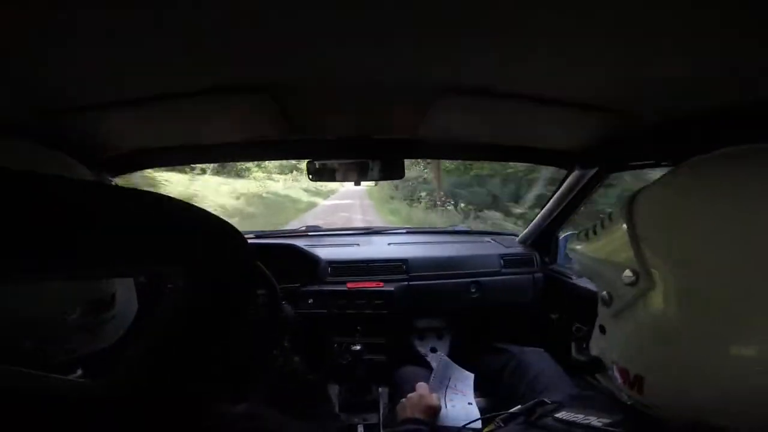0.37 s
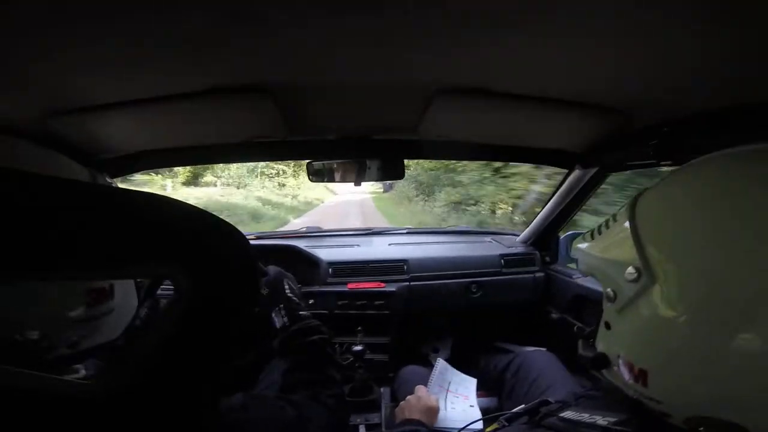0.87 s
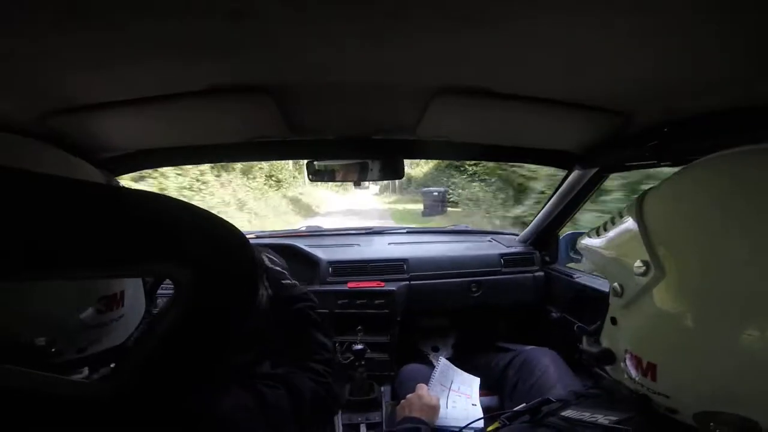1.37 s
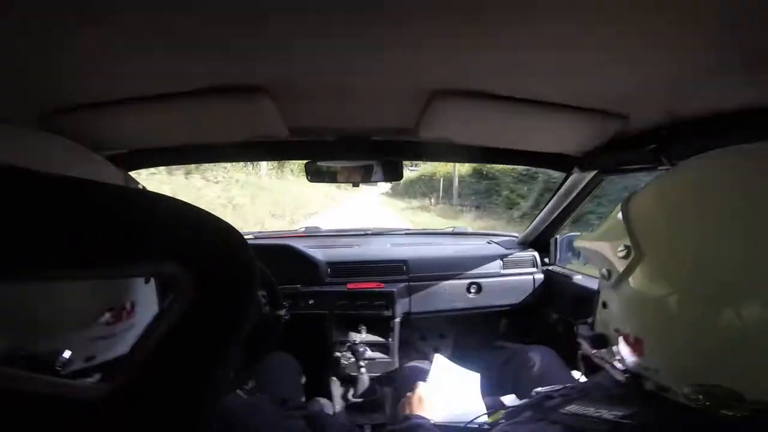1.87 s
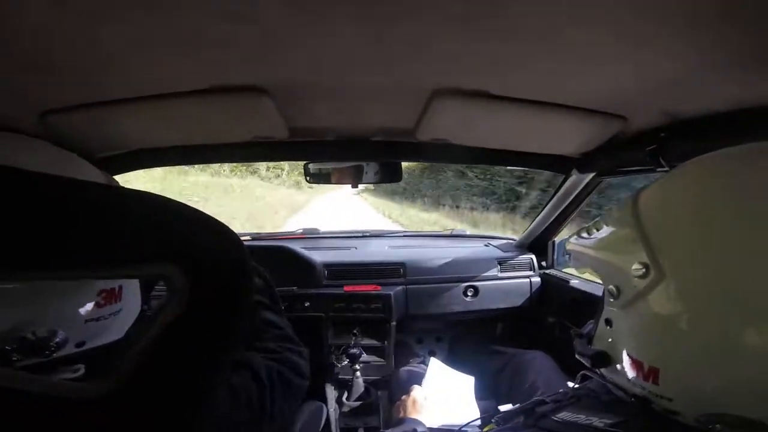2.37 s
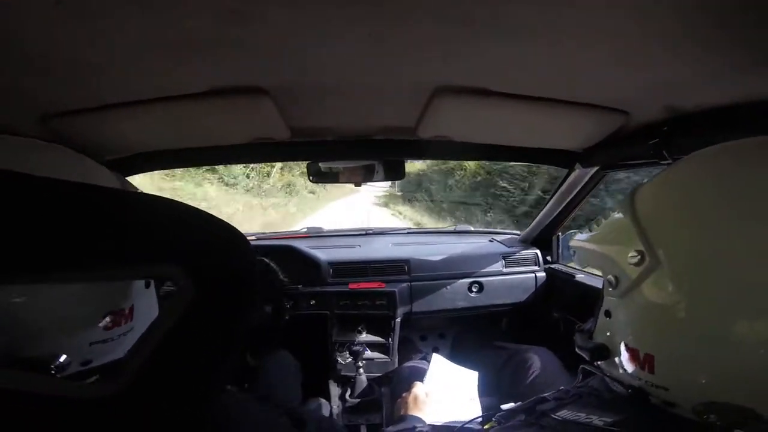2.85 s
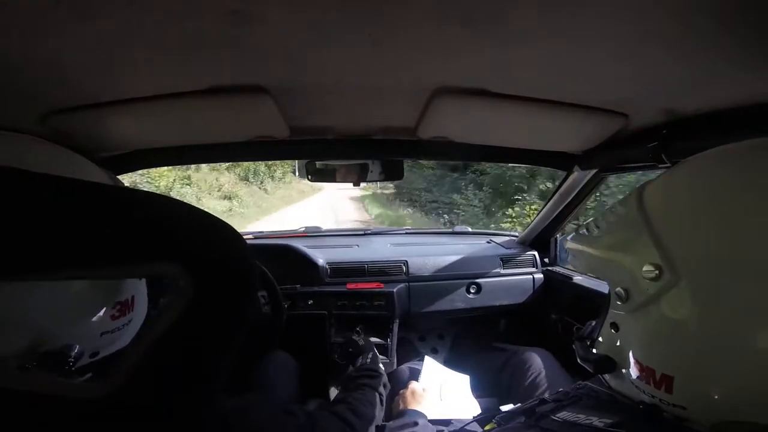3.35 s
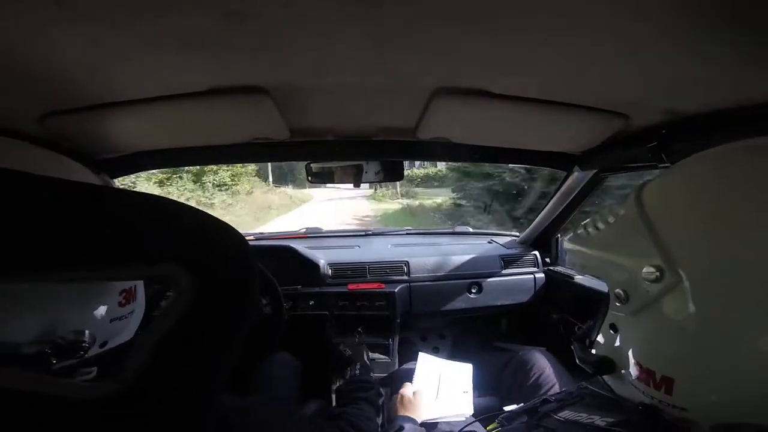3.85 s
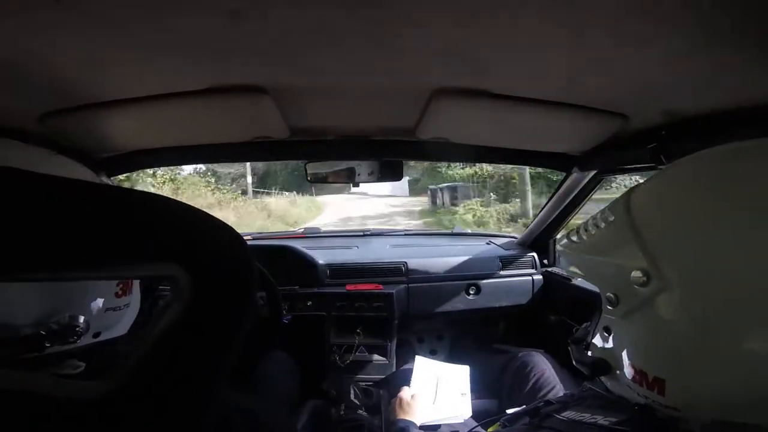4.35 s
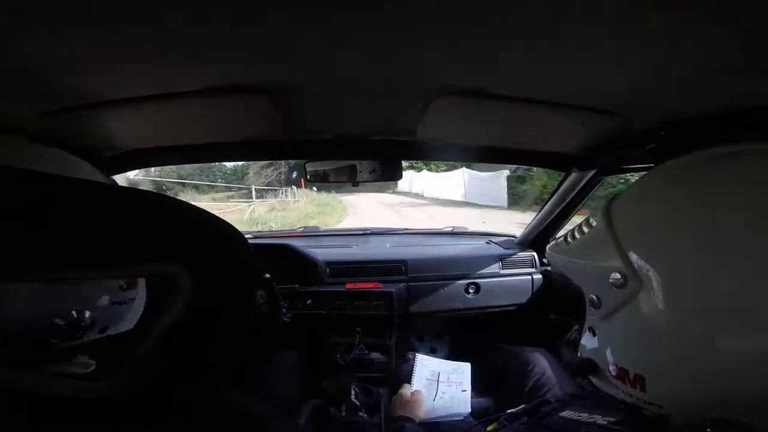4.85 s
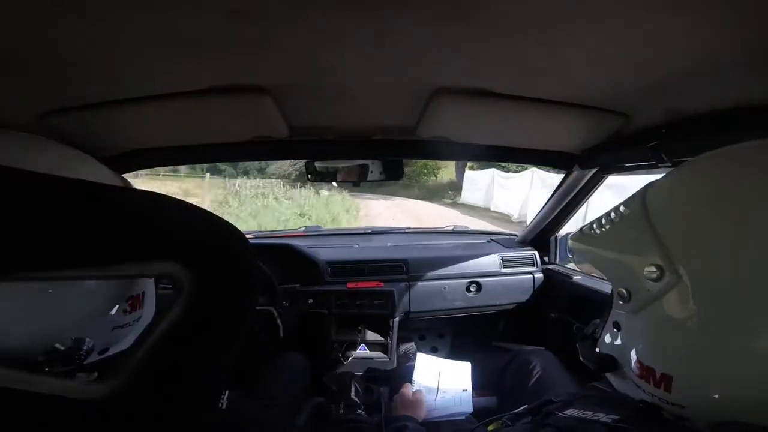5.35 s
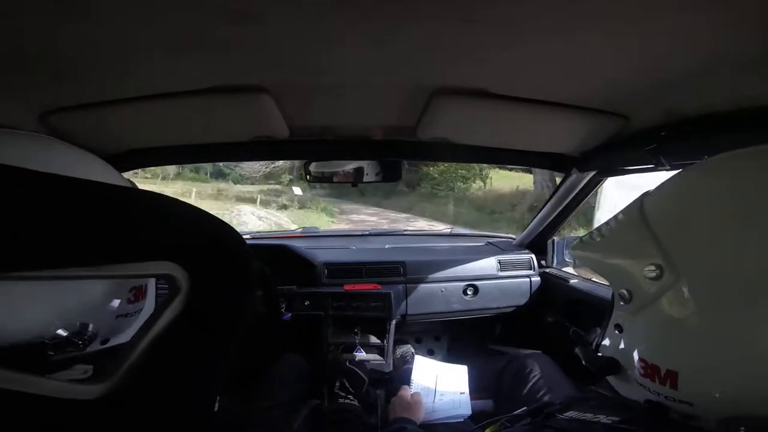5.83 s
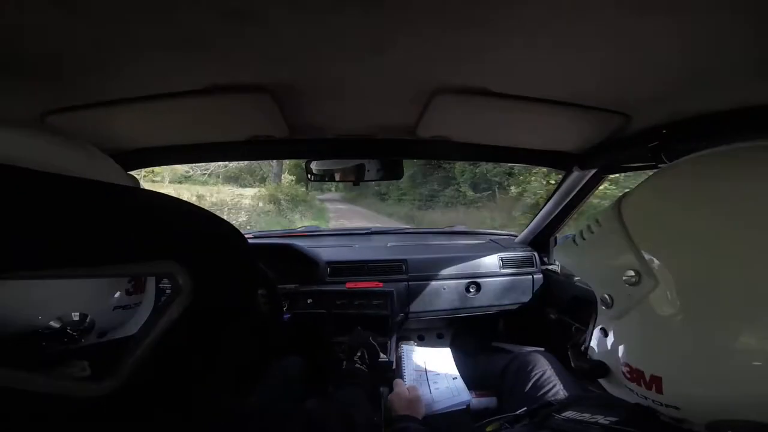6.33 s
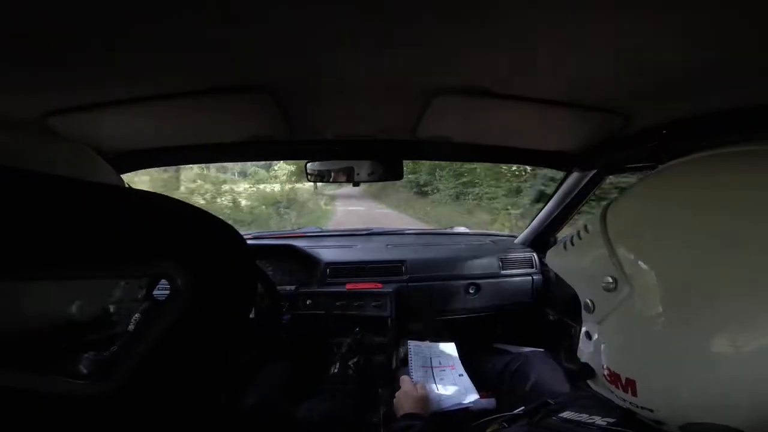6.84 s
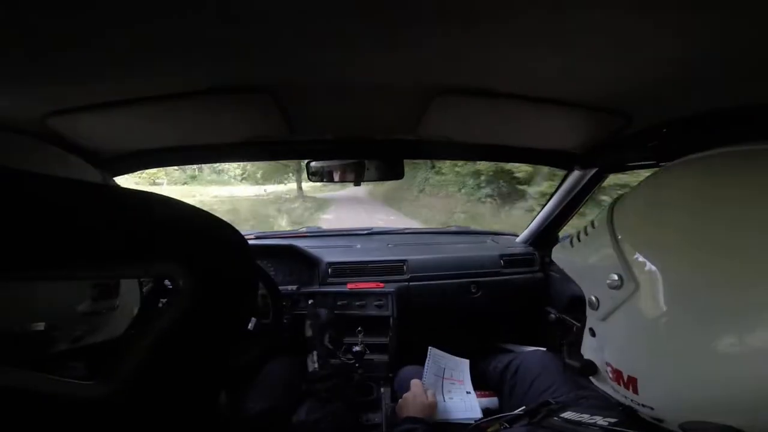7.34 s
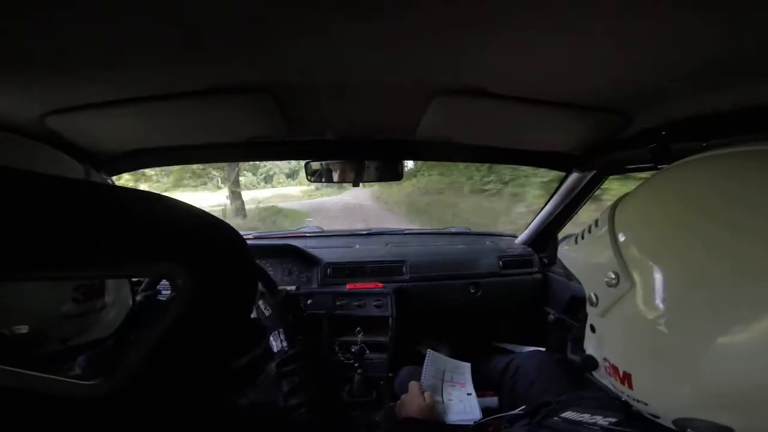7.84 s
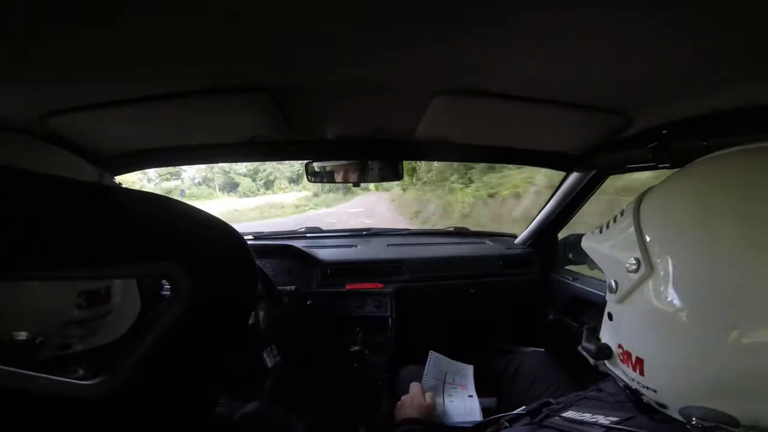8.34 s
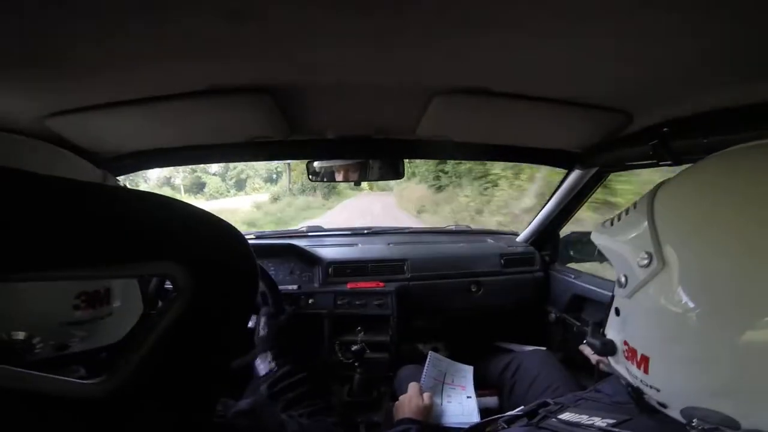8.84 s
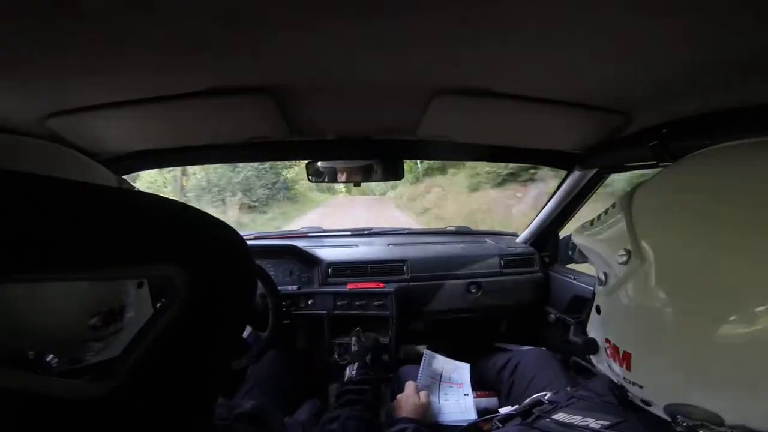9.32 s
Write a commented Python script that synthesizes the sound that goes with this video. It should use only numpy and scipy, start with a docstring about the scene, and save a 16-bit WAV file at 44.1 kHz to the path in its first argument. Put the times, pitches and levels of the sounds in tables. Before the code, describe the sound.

Close cabin microphone, dry and slightly saturated. The engine growls high at first, then coasts down unevenly while gravel rattles thickly against the metal floor. A quick rev climbs to the highest pitch, falls through a gear change and becomes a heavy low drone that slowly rises. Tyre thrum, body roar and bumps lie beneath; stones are sparser during the drone and burst back at the end.

```python
"""Hard-driven car on gravel

Inside the car a four-cylinder engine pulls, eases off, spins up and, after a gear change, booms in the cabin.
The engine is a stack of tones tied to its revs, with a noisy rasp that pulses with each firing.
Large stones crack, thud and ring under the floor: short noise bursts and dying tones. Small stones and grit
spray around them. Shaped noise makes the bumps, the tyre thrum and the roar of the car's shell.
"""
import sys
import numpy as np
from scipy import signal
from scipy.fft import rfft, irfft, next_fast_len
from scipy.io import wavfile
from scipy.ndimage import uniform_filter1d

SR = 44100
rng = np.random.default_rng(int(sys.argv[2]) if len(sys.argv) > 2 else 0)


def wrap_up_sound(samples):
    """Save the sound to the file named by the first command line argument, as 16-bit audio."""
    columns = np.atleast_2d(samples).T
    # keep every value between -1 and 1, then stretch to whole-number steps
    tamed = np.clip(columns, -1, 1)
    steps = np.round(tamed * 32767).astype(np.int16)
    wavfile.write(sys.argv[1], SR, steps)


def voltage_ratio(level):
    """Linear amplitude factor for a level in decibels (scalar or array-like)."""
    return 10 ** (np.asarray(level, float) / 20)


N = 416738  # length in samples
T = np.arange(N) / SR  # time in seconds

# How the engine is driven. Each row: time in seconds, four-stroke cycles in Hz, firing tone level in dB,
# pedal as the level of the other tones in dB.
ENGINE_DRIVE = [(0, 43.73, -20.5, -21.5), (.06, 43.74, -24, -19), (.23, 44.6, -19, -20.5),
                (.48, 44.96, -21.5, -17.5), (.76, 45.24, -20.5, -19.5), (.95, 46.12, -19.5, -18),
                (1.24, 46.33, -20, -19), (1.52, 47.03, -19.5, -17.5), (1.6, 44.74, -26, -24.5),
                (1.83, 43.1, -17.5, -24.5), (1.95, 41.9, -37, -29), (2.22, 38.43, -44, -32.5),
                (2.42, 36.8, -29, -26), (2.7, 37.7, -32, -28.5), (2.92, 37.2, -27.5, -25),
                (3.16, 35.05, -24.5, -23), (3.33, 33.22, -30.5, -38), (3.49, 33.4, -35, -45),
                (3.58, 33, -24.5, -23.5), (3.66, 32.92, -38, -26.5), (3.74, 32.22, -24.5, -44),
                (3.87, 32.46, -23, -24), (4.1, 30.12, -33, -46), (4.18, 30, -22, -30),
                (4.3, 28.76, -40, -18), (4.44, 26.4, -23.5, -44), (4.52, 26.44, -21.5, -28),
                (4.7, 26.68, -24.5, -43), (4.8, 29.5, -22.5, -57), (4.88, 32.65, -36, -40),
                (4.97, 35.2, -14.5, -23.5), (5.08, 39.75, -30, -17.5), (5.15, 43.5, -30.5, -21),
                (5.21, 45.7, -20, -20), (5.26, 46.85, -24.5, -19.5), (5.33, 48.3, -29, -20.5),
                (5.45, 49.85, -20, -20.5), (5.58, 50.4, -24.5, -21.5), (5.87, 50.6, -29, -24),
                (5.96, 49.8, -33, -29), (6.2, 45.4, -21, -27.5), (6.3, 43.05, -26.5, -22.5),
                (6.38, 36, -20, -17), (6.5, 33.1, -13, -23), (6.75, 30.98, -12.5, -20),
                (6.95, 31.65, -13, -24), (7.61, 32.35, -12.5, -17), (8.32, 33.7, -13.5, -19.5),
                (8.95, 35.15, -15.5, -20.5), (8.99, 34, -25, -46), (9.06, 33.04, -24.5, -36),
                (9.45, 30.35, -30, -22)]
# Tones from uneven cylinders and pipes. Each row: multiple of the cycle, relative level in dB under pedal
# at each of the four PEDAL_REVS, relative level in dB when coasting.
ENGINE_ORDERS = [(2, -33.5, -30, -9, -8, -10), (3, -33, -24.5, -11, -16, -9),
                 (5, -8.5, -23.5, -9.5, -8.5, -13), (6, -6, -34, -11.5, -21.5, -6.5),
                 (7, -29, -20.5, -19.5, -20, -33), (8, -15, -13, -9.5, -4.5, -14),
                 (9, -23, -22.5, -30, -11.5, -36), (10, -20.5, -33, -51, -31, -19.5),
                 (11, -22.5, -31, -29, -15, -22), (12, -29, -13, -21, -13, -19.5),
                 (13, -20.5, -37, -29, -26, -31), (14, -23.5, -27.5, -12.5, -10, -23),
                 (15, -36.5, -28, -42, -38, -30.5), (16, -13.5, -22, -17.5, -17, -37),
                 (17, -27.5, -25.5, -27.5, -24, -39), (18, -33, -18.5, -27, -25, -25),
                 (19, -25, -36.5, -19, -48, -40), (20, -31.5, -34, -22.5, -22, -29),
                 (21, -35, -36.5, -32, -39, -38), (22, -42, -34.5, -39, -33, -42),
                 (23, -40, -42, -25, -31, -26), (24, -34.5, -42.5, -29.5, -20, -43),
                 (25, -38, -39, -30.5, -27, -29), (26, -44, -38, -25.5, -31, -47),
                 (27, -50, -38, -36, -41, -38), (28, -44, -33, -25.5, -40, -39),
                 (29, -51, -33, -20, -26, -39), (30, -37.5, -45, -40.5, -23, -31),
                 (31, -46, -44, -40, -21, -44), (32, -34.5, -43, -21.5, -33, -46),
                 (34, -52, -37.5, -35, -24, -44), (36, -49.5, -40.5, -38, -27, -45)]
# The revs that the pedal levels belong to. Each entry: four-stroke cycles in Hz.
PEDAL_REVS = [31.5, 34.5, 45.5, 50.5]
# How the cabin favours some pitches. Each row: frequency in Hz, gain in dB.
CABIN_GAIN = [(40, -4), (130, -6), (250, -2.5), (300, -1), (350, -7), (380, -5), (410, -1), (460, -4.5),
              (500, -6), (530, 8), (570, -2.5), (625, 0.5), (700, -10.5), (740, -10.5), (800, -10),
              (900, -7.5), (960, -3.5), (1040, 0.5), (1110, -6), (1170, 1), (1230, -6), (1280, -2.5),
              (1350, -11.5), (1450, -9), (1510, -7), (1570, -7.5), (1750, -11)]
# Colour of the valve gear and intake rasp. Each row: frequency in Hz, relative level in dB per Hz.
CLATTER_COLOUR = [(500, -40), (1000, 4.5), (1400, 0.5), (2200, -4.5), (3800, -10), (4600, -19), (7000, -23),
                  (10000, -64)]

# Large stones. Each row: start in seconds, relative level in dB, brightest frequency in Hz,
# thud in dB against the crack (before their shared levels), time for the crack to fall 60 dB in seconds.
LARGE_STONES = [(0.4349, -22.5, 1480, 4, 0.068), (0.812, -33, 3700, -10, 0.18),
                (0.897, -27, 6400, -15, 0.03), (0.9179, -22.5, 1900, -7, 0.091),
                (1.063, -27, 6400, -8, 0.045), (1.088, -21, 6400, -11, 0.046),
                (1.266, -30, 7600, -12, 0.044), (1.4022, -28, 1970, -4.5, 0.32),
                (1.443, -18, 1480, -21, 0.11), (1.4716, -15, 1376, -25, 0.059),
                (1.4992, -16, 2680, -22.5, 0.068), (1.5428, -5, 4400, -22, 0.042),
                (1.6336, -16.5, 2480, -24, 0.18), (1.667, -14.5, 2700, -19, .1),
                (1.68, -17.5, 1580, -25, 0.089), (1.69, -20, 3135, -20, 0.055),
                (1.706, -34, 2900, -23, .06), (1.718, -23, 6400, -20, .05), (1.8208, -23, 1392, -8.5, 0.42),
                (1.8836, -22, 2940, -20, 0.16), (1.9358, -17, 2570, -9, 0.12),
                (2.0135, -27.5, 1798, -7, 0.17), (2.1121, -24.5, 2955, 2.5, 0.044),
                (2.177, -27, 3387, -19, 0.049), (2.2172, -18.5, 1478, -14.5, 0.05),
                (2.261, -19, 3384, 1, 0.045), (2.3177, -20.5, 3040, -10, 0.069),
                (2.361, -28, 4630, -8, 0.043), (2.4506, -20.5, 3620, -2, 0.035),
                (2.482, -28, 6600, -2.5, 0.24), (2.6189, -26, 2945, -6, 0.058),
                (2.6727, -17, 2670, -28, 0.045), (2.7427, -27, 3375, -4, 0.18),
                (2.809, -20, 2855, -19, 0.083), (2.8848, -20, 2850, -7.5, 0.14),
                (2.9317, -10.5, 3960, -19, 0.056), (2.948, -17, 3930, -10, .1),
                (2.994, -19, 1810, -18, .08), (3.005, -18, 3840, -14, 0.17), (3.053, -17, 1830, -10, 0.14),
                (3.066, -18, 3900, -15, .08), (3.1005, -16.5, 6400, -14, 0.07),
                (3.112, -19, 3600, -7, 0.069), (3.2634, -25, 2172, -1, 0.027),
                (3.6341, -17.5, 1463, -26, 0.075), (3.695, -24, 3753, -16, 0.066),
                (3.707, -15, 3700, -7, 0.11), (3.738, -14, 1100, -4, 0.026),
                (3.912, -19.5, 3660, -6, 0.092), (3.9736, -26.5, 1624, -17, 0.32),
                (4.0136, -19.5, 3710, -5, 0.071), (4.1104, -14, 1663, -4.5, 0.11),
                (4.112, -17, 3800, -25, 0.025), (4.1574, -23.5, 1410, 1, 0.19),
                (4.199, -28, 1960, -1, 0.053), (4.2388, -32, 2125, 8.5, 0.08),
                (4.2782, -18, 2710, 3, 0.056), (4.323, -24, 2490, -13, 0.054),
                (4.3673, -20, 3450, 3, 0.082), (4.376, -27, 1200, 1, 0.048),
                (4.4458, -23, 3704, -2.5, 0.15), (4.4732, -21.5, 3043, -11.5, 0.12),
                (4.5158, -17.5, 3850, -32, 0.099), (4.521, -20, 2580, -30, 0.084),
                (4.6336, -29, 3824, -3.5, 0.48), (4.6869, -21.5, 3813, -14.5, 0.075),
                (4.7434, -36, 3722, -20, 0.19), (4.8424, -10.5, 3780, -27, 0.046),
                (4.8795, -23.5, 3358, -4, 0.15), (5.1133, -27, 1496, -1, 0.11),
                (5.3652, -22, 3720, -5, 0.23), (5.4544, -21, 6370, -4, 0.13),
                (5.5431, -17.5, 2893, -7, 0.064), (5.5933, -17, 2855, -9, 0.062),
                (5.6905, -23.5, 2484, 3, 0.062), (5.7365, -25, 1699, -9, 0.081),
                (5.768, -14, 3835, -14, 0.04), (5.7977, -22, 2270, -13, 0.094),
                (5.8473, -10, 2516, -3, 0.045), (5.9271, -29.5, 1410, -1.5, 0.21),
                (6.006, -30, 6400, -5, 0.078), (6.022, -30, 6400, -9, 0.062),
                (6.052, -32, 6400, -10, 0.068), (6.081, -29, 6400, 1, 0.12), (6.156, -39, 6400, -11, .07),
                (6.2284, -25.5, 7500, -5.5, 0.081), (6.4312, -15, 2520, -18, 0.02),
                (6.474, -17.5, 1797, -10, 0.036), (6.5512, -29, 5030, -11, 0.058),
                (6.583, -28, 5200, -9, .05), (6.625, -31, 4000, -10, .05), (6.6477, -24, 1436, -2, 0.064),
                (6.696, -24, 1516, -15, 0.066), (6.7356, -27.5, 2935, -9, 0.089),
                (6.773, -18.5, 1864, -5, 0.078), (6.8575, -23, 3850, -14, 0.053),
                (6.9979, -27.5, 5500, -7, 0.042), (7.084, -29.5, 2248, -4, 0.13),
                (7.1354, -29.5, 1722, 3, 0.064), (7.166, -23, 1773, -6, 0.059),
                (7.2383, -27.5, 1465, -7.5, 0.065), (7.3471, -22.5, 6400, -10, 0.079),
                (7.47, -33.5, 5490, -10, 0.054), (7.5873, -25, 1740, -18, 0.088),
                (7.7056, -23, 2025, -4.5, 0.076), (7.7233, -12.5, 2642, -16.5, 0.053),
                (7.743, -18.5, 7480, -16.5, 0.071), (7.8427, -25.5, 1689, -4, 0.051),
                (7.8747, -28, 1966, -12, 0.045), (8.02, -38.5, 6400, -10, 0.086),
                (8.22, -36, 7470, -14, 0.027), (8.238, -31, 1390, -5, 0.046),
                (8.313, -23.5, 2692, -5, 0.077), (8.3491, -21.5, 1413, -16, 0.063),
                (8.447, -32, 1396, -3, 0.059), (8.5132, -18.5, 1405, -1, 0.032),
                (8.6615, -21.5, 2539, -20, 0.07), (8.6975, -30.5, 1987, -1.5, 0.2),
                (8.7298, -29.5, 1410, 6.5, 0.088), (8.8857, -39.5, 1823, 6, 0.14),
                (9.0165, -21, 2964, -16, 0.2), (9.0442, -10, 3540, -15.5, 0.047),
                (9.0748, -16.5, 2490, -7.5, 0.11), (9.1232, -21, 6560, -17.5, 0.18),
                (9.14, -21, 1790, -11, .1), (9.183, -21.5, 3890, -11, 0.15), (9.2154, -17, 3750, -11, 0.2),
                (9.2571, -14.5, 1574, -7.5, 0.21), (9.31, -24, 2280, -3, 0.096),
                (9.385, -28, 3430, -8, 0.089), (9.44, -20.5, 2490, -3, .1)]
# Floor panel under a heavy stone. Each row: resonance in Hz, width in Hz, relative gain in dB.
PANEL_THUD = [(509, 104, -0.5), (646, 216, 4), (938, 500, -3.5)]
# Clear rings of one panel spot under a stone. Each row: start in seconds, relative level in dB,
# pitch in Hz, time to fall 60 dB in seconds.
PANEL_PINGS = [(.437, -33, 700, .05), (1.544, -22, 4430, .03), (1.545, -32, 3330, 0.028),
               (1.636, -35, 2520, .04), (1.669, -30, 2610, .07), (1.679, -16, 1570, 0.036),
               (1.688, -23, 3250, 0.052), (1.689, -19, 2000, 0.027), (1.708, -30, 1967, .03),
               (1.884, -28, 3130, .05), (1.939, -30, 2830, .06), (3.695, -19, 970, .05),
               (3.696, -23, 1950, 0.033), (3.705, -19, 533.5, 0.082), (3.709, -29, 3720, .07),
               (3.714, -18, 2200, 0.044), (3.72, -19, 658, 0.089), (3.736, -22, 750, 0.046),
               (4.111, -24, 1560, 0.052), (4.112, -20, 1850, 0.071), (4.112, -14, 3850, .03),
               (4.117, -28, 686, 0.1), (4.217, -22, 760, .05), (4.266, -17, 546, 0.098),
               (4.373, -21, 675, .04), (4.378, -14.5, 531, 0.093), (2.932, -23, 3000, .03),
               (2.933, -28, 3800, 0.029), (4.516, -25, 3800, 0.039), (4.518, -22, 2560, 0.046),
               (5.768, -32, 3830, .04), (5.847, -24, 1354, 0.059), (9.078, -26, 2450, .08)]
# Colour of the floor pan. Each row: frequency in Hz, gain in dB.
PAN_COLOUR = [(400, 1), (700, -1.5), (1060, -1), (1500, -5.5), (2130, -3.5), (3000, -5.5), (4300, -10.5),
              (5040, -12.5), (7000, -14.5), (8790, -20), (9720, -28.5), (11500, -32.5), (14000, -43.5),
              (14600, -80.5)]
# Ringing trim near the microphone. Each row: resonance in Hz, width in Hz, relative gain in dB.
TRIM_RINGS = [(3850, 530, 5), (6400, 255, 10.5), (6595, 63, 5.5), (11100, 480, 6.5)]
# Gravel spray. Each row: time in seconds, level in dB.
SPRAY_LEVEL = [(0, -45.5), (.85, -48), (.97, -34), (1.1, -44.5), (1.37, -44.5), (1.43, -43), (1.6, -31.5),
               (1.73, -30.5), (1.8, -40), (1.95, -43), (2.5, -36), (2.78, -47), (2.97, -25.5), (3.1, -31.5),
               (3.2, -37), (3.45, -46), (3.65, -36), (4, -36.5), (4.25, -26.5), (4.5, -35.5), (4.74, -32),
               (5.05, -41.5), (5.45, -38), (5.9, -42), (6.15, -44), (6.35, -38.5), (6.55, -46), (6.8, -43),
               (7.5, -53), (7.72, -45.5), (8, -48), (8.4, -48), (9, -46), (9.08, -31.5), (9.19, -30),
               (9.45, -37.5)]

# Bumps in the road. Each row: time in seconds, suspension rumble in dB, body shake in dB.
BUMP_LEVELS = [(0.0, -28, -26), (0.55, -21.5, -34), (0.92, -36.5, -32), (1.05, -23.5, -29.5),
               (1.63, -32.5, -25.5), (1.76, -24, -39), (1.95, -13, -27), (2.5, -30, -24),
               (2.58, -27.5, -36), (2.94, -28, -29.5), (3.42, -26, -29), (3.89, -23, -32.5),
               (3.97, -19.5, -23), (4.21, -32.5, -19.5), (4.42, -17, -29), (4.47, -36, -45.5),
               (4.55, -26, -9.5), (4.63, -34, -34), (4.79, -18, -27.5), (5.0, -17.5, -50),
               (5.26, -40.5, -20.5), (5.71, -20, -34.5), (5.81, -25, -19.5), (5.87, -31.5, -26),
               (8.5, -32, -33.5), (9.32, -33.5, -22.5), (9.4, -23.5, -34), (9.45, -24, -38)]
# Steadier road sound. Each row: time in seconds, tyre thrum in dB, shell roar in dB.
ROAD_LEVELS = [(0, -41.5, -25.5), (.7, -40, -25.5), (1.4, -27, -23.5), (1.75, -22.5, -23.5),
               (2.05, -28, -24.5), (2.5, -32.5, -33), (2.75, -27.5, -32.5), (3, -22.5, -28.5),
               (3.5, -26, -32), (4, -25, -27), (4.3, -24.5, -24), (4.7, -23, -28), (5.1, -31, -28),
               (5.35, -24, -28.5), (5.75, -26.5, -24.5), (6.1, -25, -27), (6.5, -32.5, -24.5),
               (7, -27, -25.5), (7.7, -30, -27), (8.3, -36, -28), (8.8, -32, -24), (9.05, -24, -28),
               (9.45, -24, -31)]
# Colour of the suspension rumble. Each row: frequency in Hz, relative level in dB per Hz.
RUMBLE_COLOUR = [(9, -27), (16, -1.5), (25, 10.5), (33, 1.5), (42, -20), (100, -73)]
# Colour of the body shake. Each row: frequency in Hz, relative level in dB per Hz.
SHAKE_COLOUR = [(22, -41.5), (34, 3), (44, 11), (54, 1.5), (66, -20), (120, -74)]
# Colour of the tyre thrum. Each row: frequency in Hz, relative level in dB per Hz.
THRUM_COLOUR = [(35, -40), (52, -10), (68, -4.5), (83, 7.5), (98, 3), (120, 8.5), (140, -5.5), (165, -4.5),
                (250, -16), (310, -5), (400, -48), (660, -100)]
# Colour of the shell roar. Each row: frequency in Hz, relative level in dB per Hz.
ROAR_COLOUR = [(35, -39.5), (60, -3.5), (75, -13), (100, -16.5), (132, -5), (198, -11.5), (363, -23.5),
               (504, -22), (851, -32), (3000, -50.5), (3900, -83), (6600, -120)]


def evened(x):
    """Scales a sound to an average (rms) strength of 1."""
    return x / np.sqrt(np.mean(x ** 2) + 1e-20)


def read(points, hz):
    """Reads a table of levels between its rows, on a log-frequency axis."""
    f, value = np.transpose(points)
    return np.interp(np.log(hz + 1), np.log(f + 1), value)


def curves(rows):
    """Joins each column of a table by straight lines in time."""
    s, *columns = np.transpose(rows)
    return [np.interp(T, s, c) for c in columns]


def colour(x, points):
    """Makes each frequency louder or softer, as a table says."""
    size = next_fast_len(len(x))
    gain = voltage_ratio(read(points, np.fft.rfftfreq(size, 1 / SR)))
    return irfft(rfft(x, size) * gain, size)[:len(x)]


def resonate(x, hz, width_hz):
    """One resonance with gain 1 at its top; a narrow one rings longer."""
    r = np.exp(-np.pi * width_hz / SR)
    return 2 * signal.lfilter([1 - r], [1, -r * np.exp(2j * np.pi * hz / SR)], x).real


def drift(rate_hz):
    """A random wander of rms 1; a higher rate wanders faster."""
    knots_per_s = 200
    knots = rng.standard_normal(int(T[-1] * knots_per_s) + 2)
    smooth = signal.lfilter([1], [1, -np.exp(-2 * np.pi * rate_hz / knots_per_s)], knots)
    return np.interp(T, np.arange(len(knots)) / knots_per_s, evened(smooth))


def engine(waver_db=1.06, patchy_db=0.0544, slip=0.022):
    """Tones at multiples of the cycle: the fourth is the firing, the rest pass the cabin's resonances."""
    hz, firing_db, throttle_db = curves(ENGINE_DRIVE)
    angle = 2 * np.pi * np.cumsum(hz) / SR
    # 0 with the pedal level at -23 dB or above, 1 once it is 3.5 dB lower
    coasting = np.clip((throttle_db + 23) / -3.5, 0, 1)

    # steady revs give clean tones, changing revs blur them
    change = uniform_filter1d(np.abs(np.gradient(hz)) * SR, SR // 10)  # Hz per second
    blur = slip * np.clip(change - 2, 0, 14)

    # off the pedal the firing tone stumbles
    stumble_db = 2.5 * coasting ** 2 * drift(8)
    firing_level = voltage_ratio(firing_db + stumble_db + .5 * drift(20))
    out = firing_level * np.cos(4 * angle + .06 * drift(15))

    for k, *pull_db, coast_db in ENGINE_ORDERS:
        k = round(k)
        pattern_db = (1 - coasting) * np.interp(hz, PEDAL_REVS, pull_db) + coasting * coast_db
        sway_db = (waver_db + patchy_db * k) * drift(2.0)  # high tones come and go more
        level = voltage_ratio(throttle_db + pattern_db + read(CABIN_GAIN, k * hz) + sway_db)
        wobble = (.05 + blur * k / 8) * drift(8)
        out += level * np.cos(k * angle + wobble + 2 * np.pi * rng.random())
    return np.sqrt(2) * out  # makes the levels rms


def clatter(level_db=-21, per_hz_db=.5, pulsing=0.15):
    """Valve gear and intake rasp: noise that pulses with each firing, louder with revs and pedal."""
    hz, _, throttle_db = curves(ENGINE_DRIVE)
    firings = np.cos(8 * np.pi * np.cumsum(hz) / SR)  # four per cycle
    rasp = evened(colour(rng.standard_normal(N), CLATTER_COLOUR)) * (1 + pulsing * firings)
    return voltage_ratio(level_db + throttle_db + per_hz_db * (hz - 49.0)) * rasp


def crack(t60, hz, focus=1.8, rise_s=0.001, mate=0.87, ring=0.0):
    """A rattle that swells fast and dies away; the struck spot rings at its pitch and one chance mate."""
    t = np.arange(SR // 5) / SR
    shape = voltage_ratio(-60 * t / max(t60, .02)) * (1 - np.exp(-t / rise_s))
    burst = rng.standard_normal(len(t)) * shape
    mate_hz = hz * rng.uniform(0.44, 1.9)
    own_ring = focus * resonate(burst, hz, 0.077 * hz)
    mate_ring = mate * resonate(burst, mate_hz, 0.093 * mate_hz)
    return burst + own_ring + mate_ring + ring * shape * np.sin(2 * np.pi * hz * t)


def pan(x):
    """The floor pan colours the sound and the trim rings along at its resonances."""
    x = colour(x, PAN_COLOUR)
    return x + sum(voltage_ratio(db - 3.0) * resonate(x, hz, width) for hz, width, db in TRIM_RINGS)


def stones(crack_db=-7, thud_db=-11):
    """Each large stone cracks on the pan and thuds in the panel, which swells more slowly."""
    cracks, thuds = np.zeros((2, N + SR))
    for s, db, hz, low_db, t60 in LARGE_STONES:
        at = round(s * SR)
        burst = crack(t60, hz, focus=1.08, rise_s=0.0014, ring=0.28)
        hard_db = 1 + rng.standard_normal()  # treble tilt in dB per octave, different for each stone
        tilt = [(750, -2 * hard_db), (12000, 2 * hard_db)]
        cracks[at:at + len(burst)] += voltage_ratio(db) * colour(burst, tilt)
        thump = crack(1.49 * t60, rng.uniform(525, 600), focus=0.29, rise_s=0.0087, ring=0.12)
        thuds[at:at + len(burst)] += voltage_ratio(db + low_db) * thump
    unit = np.std(pan(rng.standard_normal(SR)))  # the pan's gain on plain noise
    thud = sum(voltage_ratio(db + 21.5) * resonate(resonate(thuds, hz, 3 * width), hz, width)
               for hz, width, db in PANEL_THUD)
    return (voltage_ratio(crack_db) * pan(cracks) / unit + voltage_ratio(thud_db) * thud)[:N]


def pings(rise_s=0.0013, beat=0.027):
    """Each ring of a panel spot is a close pair of dying tones that beat."""
    out, t = np.zeros(N + SR), np.arange(SR // 5) / SR
    for s, db, hz, t60 in PANEL_PINGS:
        detune, phase = rng.random(2)
        mate_hz = hz * (1 + beat * (2 * detune - 1))
        pair = np.sin(2 * np.pi * hz * t) + .4 * np.sin(2 * np.pi * (mate_hz * t + phase))
        shape = voltage_ratio(db - 60 * t / t60) * (1 - np.exp(-t / rise_s))
        out[round(s * SR):][:len(t)] += shape * pair
    return out[:N]


def gravel(per_s=160, spread_db=5.0, hiss=0.52, count=16):
    """Small stones land at random in many sizes over a flickering fine hiss of grit."""
    kind = rng.integers(0, count, N)
    chance = np.minimum(rng.exponential(1, N), 2.5)  # mostly small stones, few big ones
    size = voltage_ratio(spread_db * chance) * (rng.random(N) < per_s / SR)
    ticks = 0
    for k, hz in enumerate(np.geomspace(1200, 9000, count)):
        tick = crack(rng.uniform(0.007, 0.16), hz)
        ticks = ticks + signal.oaconvolve(size * (kind == k), tick)[:N]
    grit = hiss * rng.standard_normal(N) * voltage_ratio(2.2 * drift(30))
    return voltage_ratio(curves(SPRAY_LEVEL)[0]) * evened(pan(evened(ticks) + grit))


def shell(jolt_db=2.5, lump_hz=4.5):
    """Bumps shake the suspension and body; tyres and exhaust set the shell thrumming and roaring."""
    colours = (RUMBLE_COLOUR, SHAKE_COLOUR, THRUM_COLOUR, ROAR_COLOUR)
    rumble, shake, thrum, roar = (evened(colour(rng.standard_normal(N), c)) for c in colours)
    rumble_db, shake_db = curves(BUMP_LEVELS)
    thrum_db, roar_db = curves(ROAD_LEVELS)
    # each level also wanders at random
    out = voltage_ratio(rumble_db + jolt_db * drift(lump_hz)) * rumble
    out += voltage_ratio(shake_db + jolt_db * drift(lump_hz)) * shake
    out += voltage_ratio(thrum_db + 2 * drift(lump_hz)) * thrum
    out += voltage_ratio(roar_db + 2.3 * drift(9.4)) * roar
    return out


def scene():
    """Everything adds up at one microphone in the cabin."""
    return (engine() + clatter() + stones() + pings() + gravel() + shell())[None]


def low_pass(x):
    """Removes everything above the highest recorded frequency."""
    return signal.sosfilt(signal.butter(12, 14540, fs=SR, output="sos"), x)


def record(dry):
    """The microphone saturates softly: peaks are bent to stay below 0.71."""
    mix = 0.71 * np.tanh(dry / 0.71)
    return low_pass(mix)


dry = scene()
out = record(dry)
wrap_up_sound(out)
```